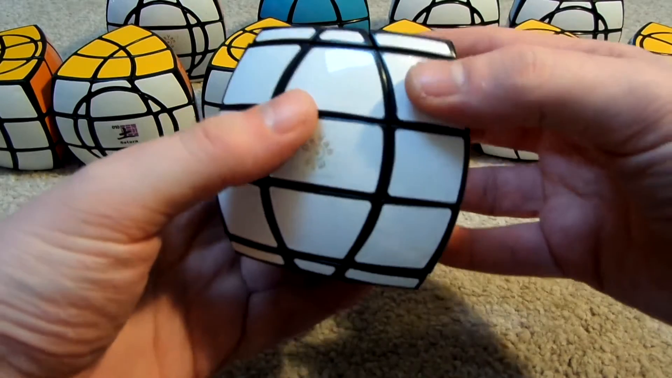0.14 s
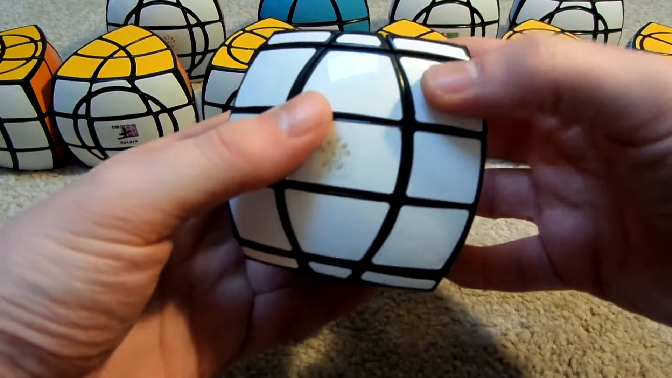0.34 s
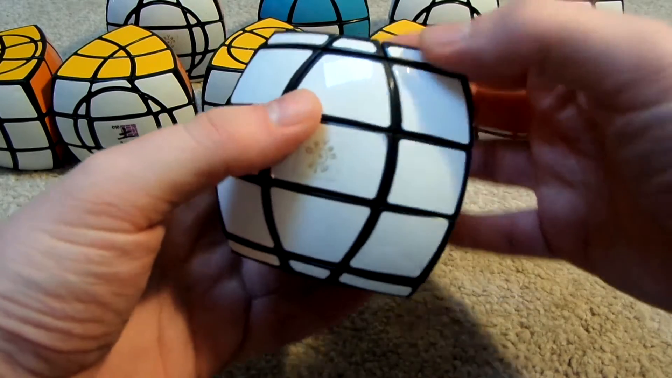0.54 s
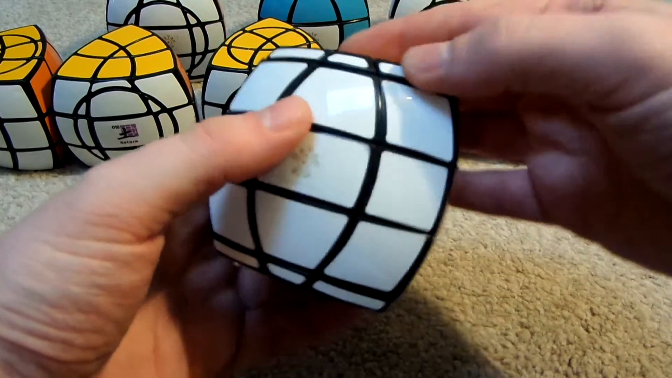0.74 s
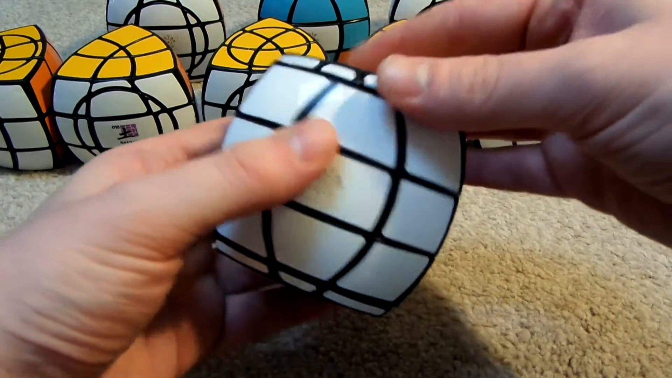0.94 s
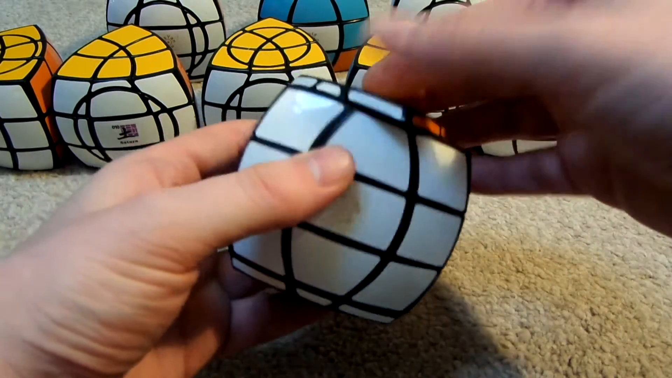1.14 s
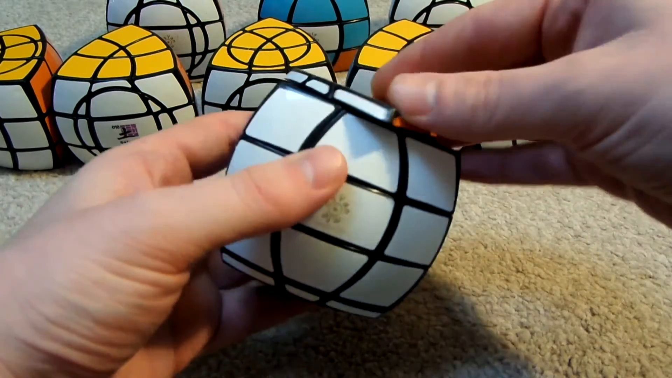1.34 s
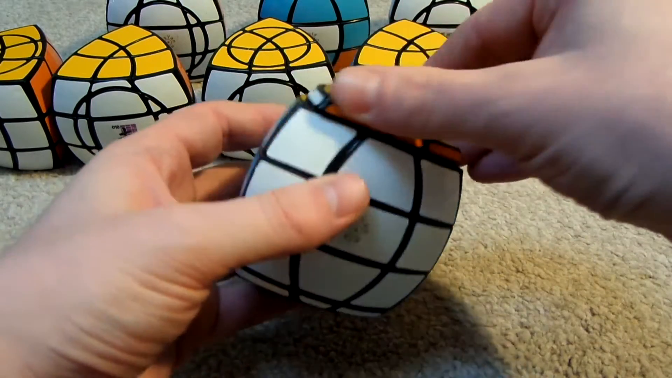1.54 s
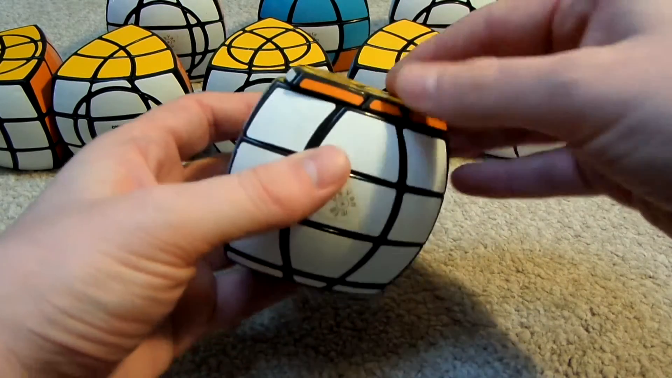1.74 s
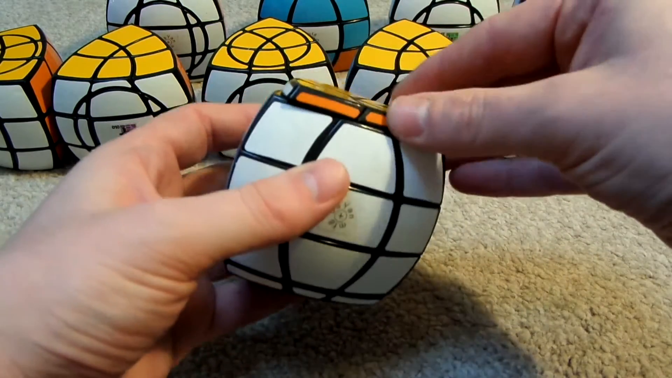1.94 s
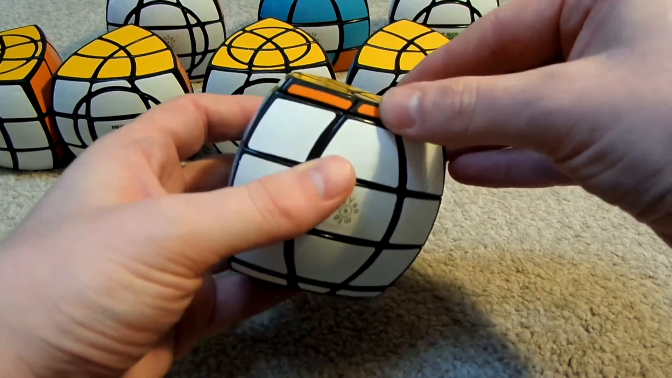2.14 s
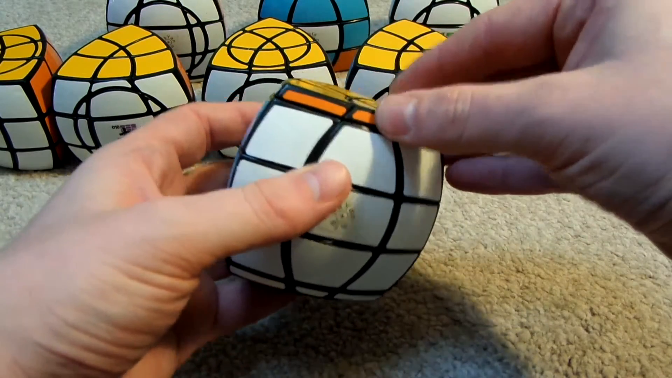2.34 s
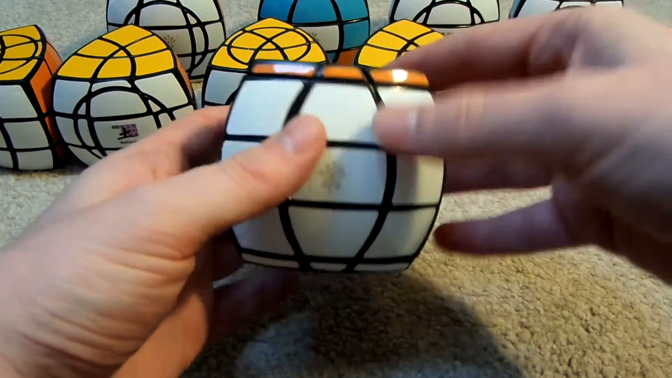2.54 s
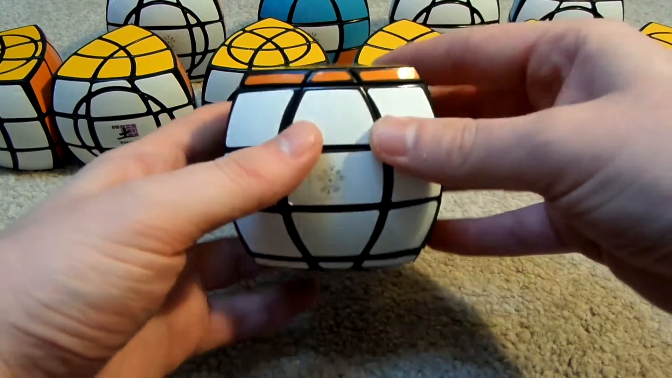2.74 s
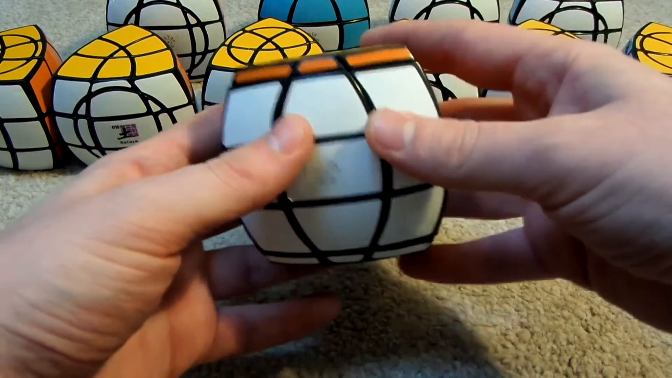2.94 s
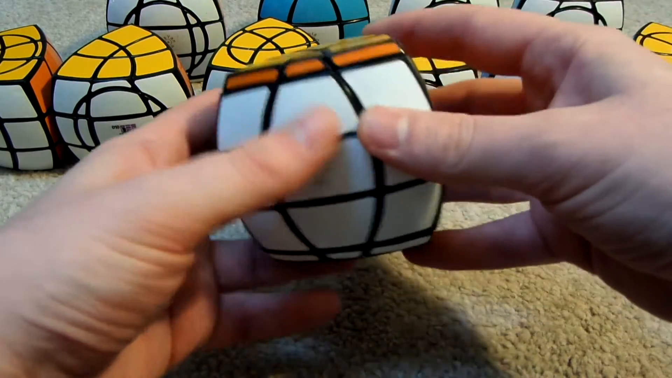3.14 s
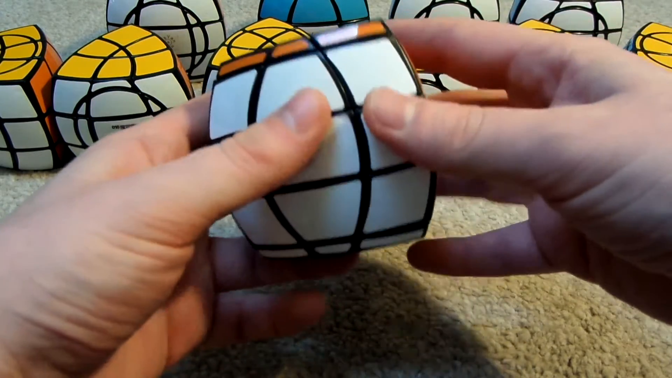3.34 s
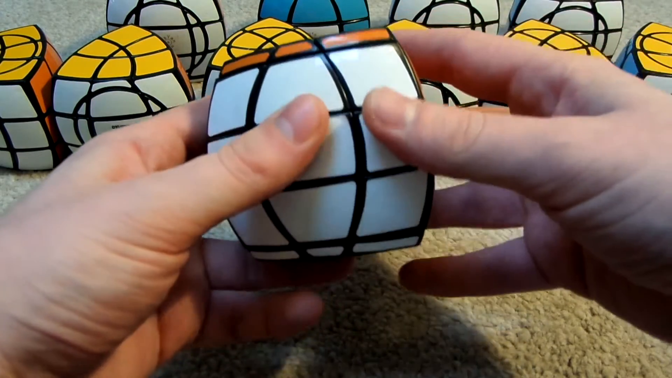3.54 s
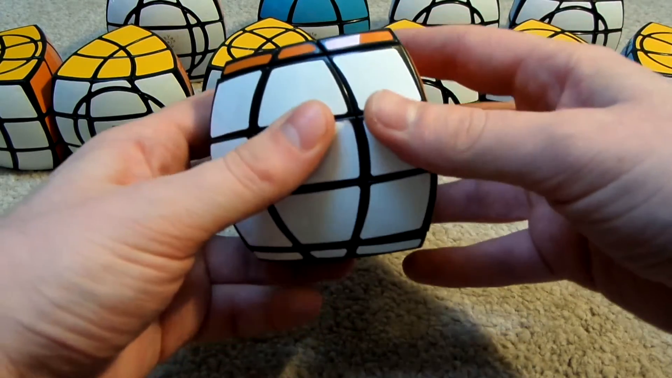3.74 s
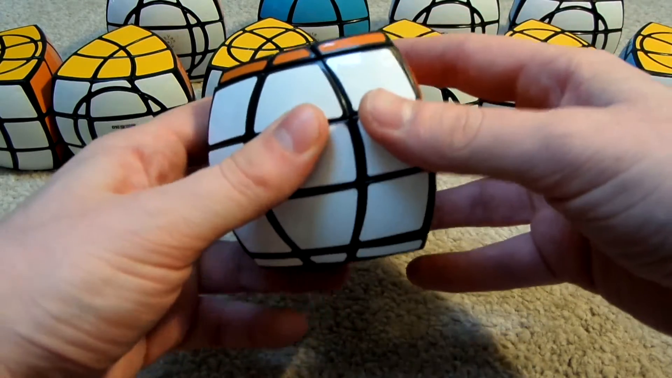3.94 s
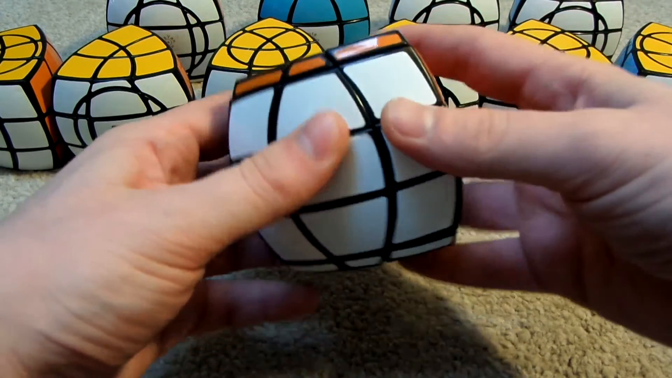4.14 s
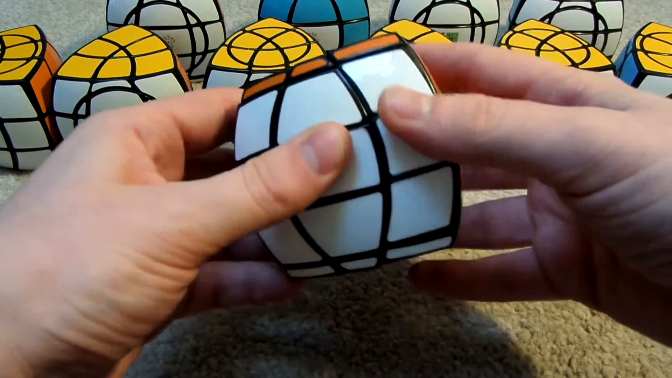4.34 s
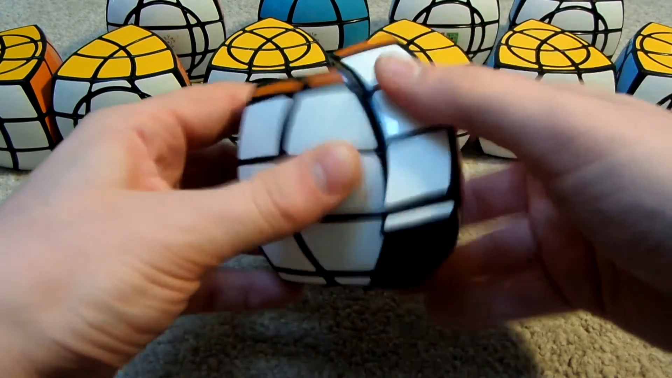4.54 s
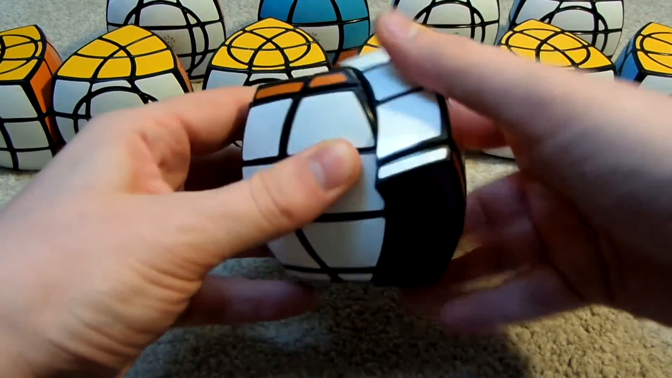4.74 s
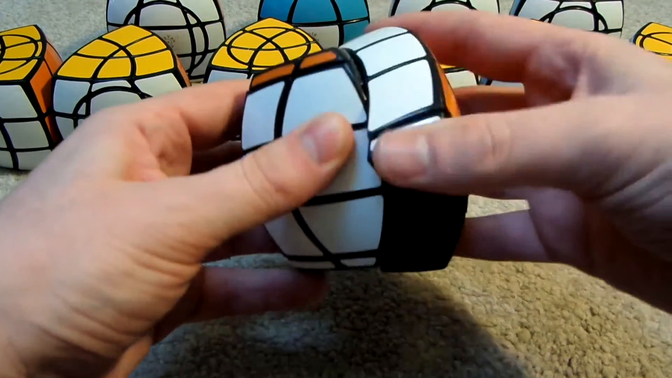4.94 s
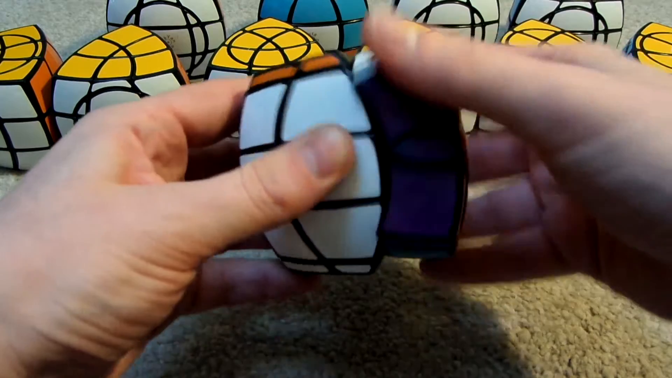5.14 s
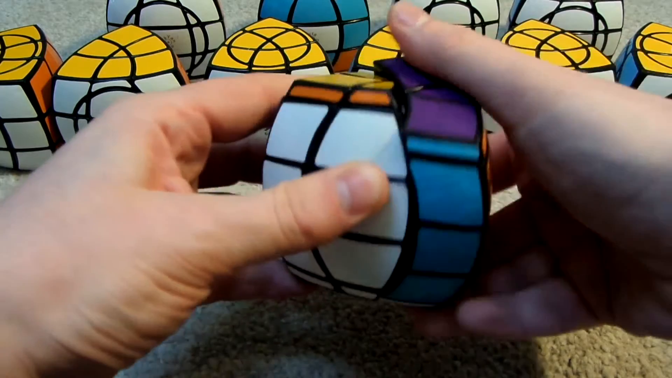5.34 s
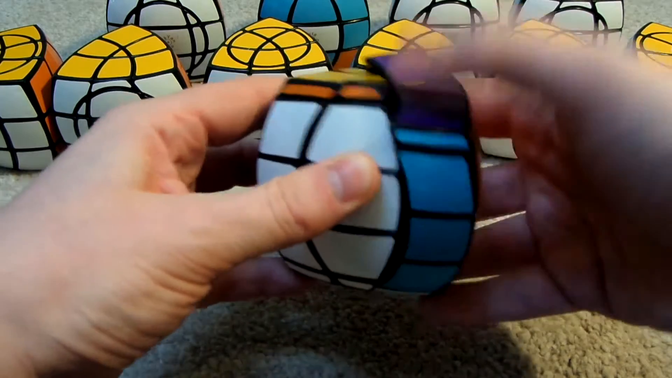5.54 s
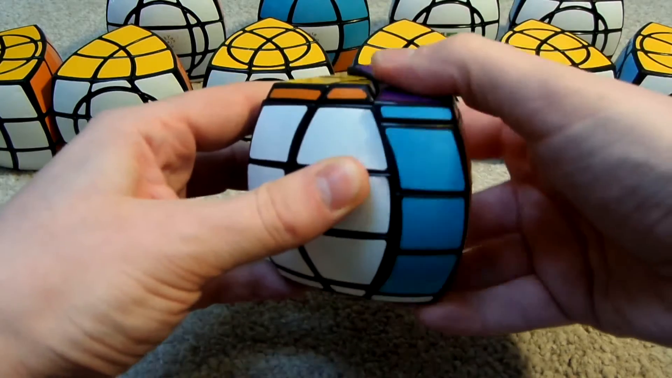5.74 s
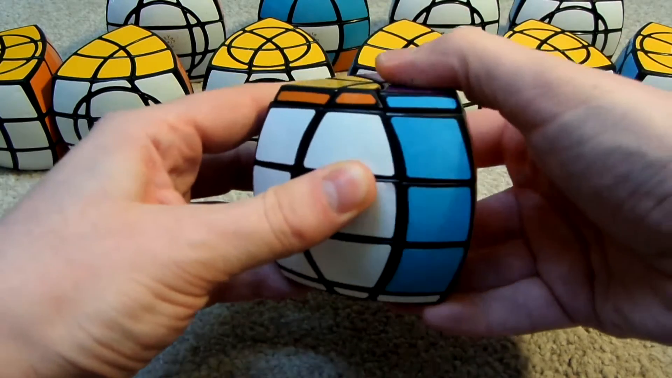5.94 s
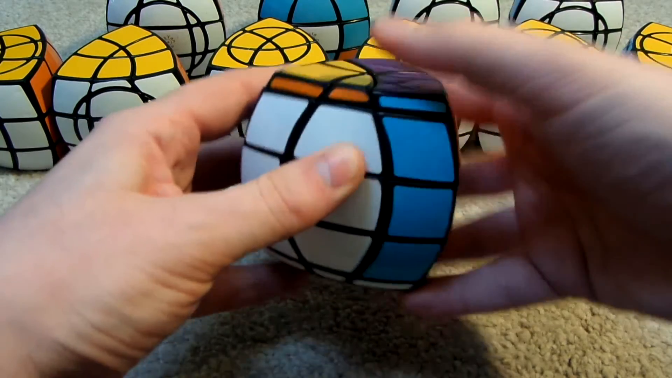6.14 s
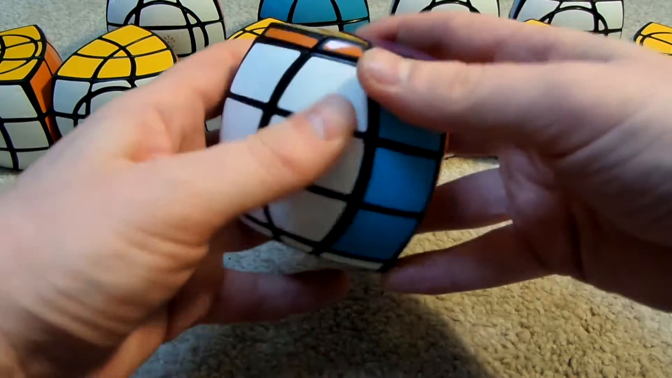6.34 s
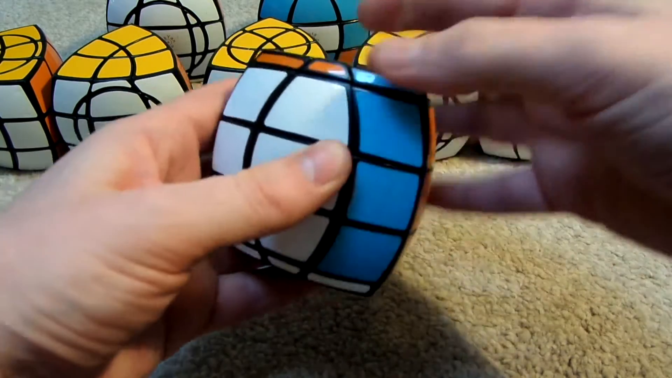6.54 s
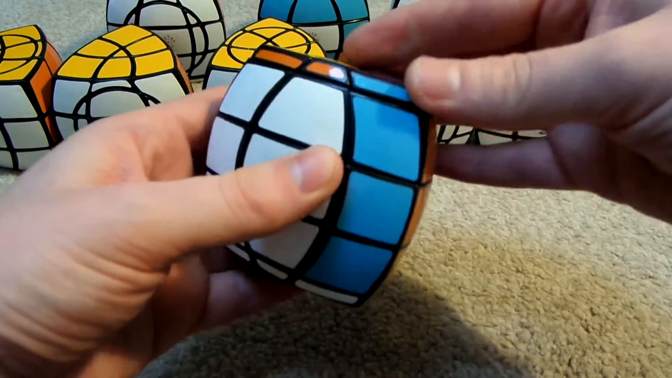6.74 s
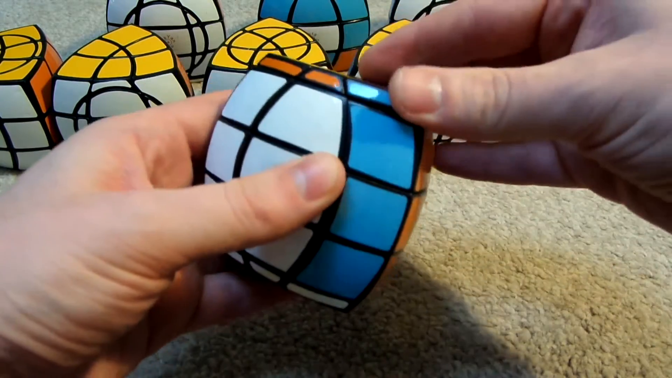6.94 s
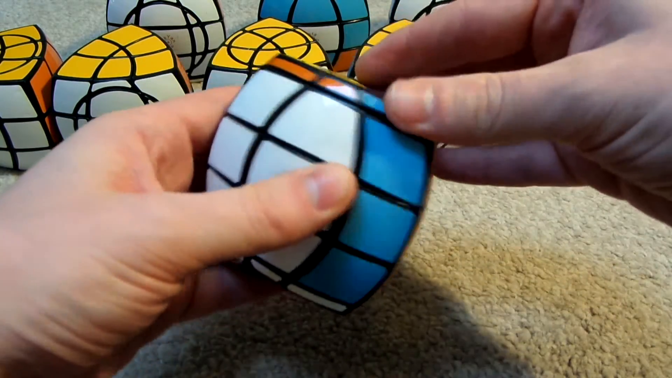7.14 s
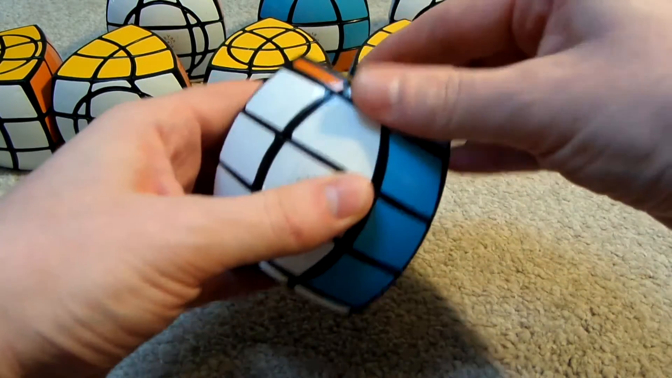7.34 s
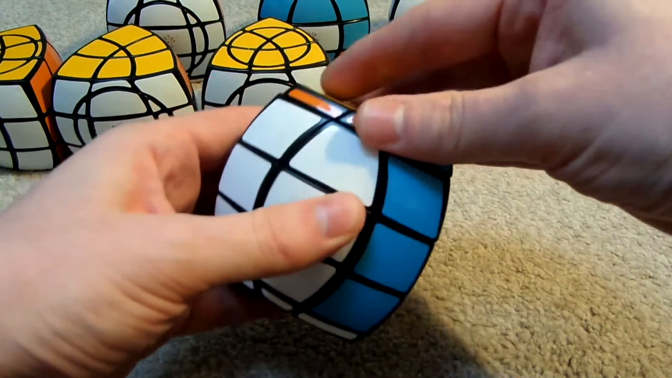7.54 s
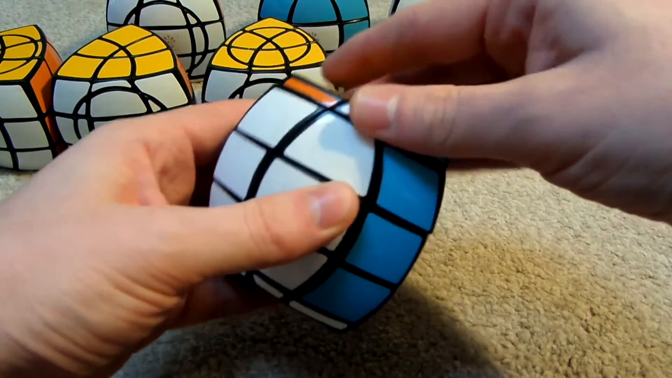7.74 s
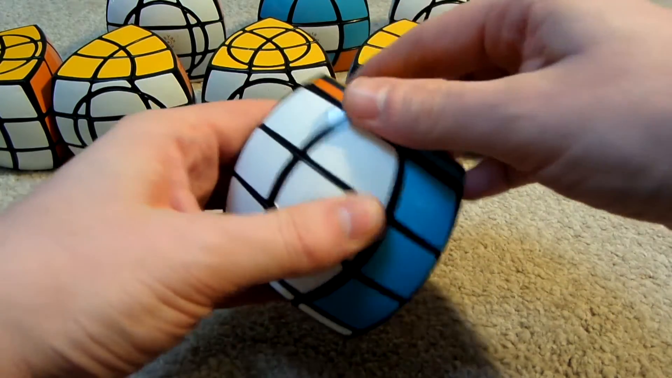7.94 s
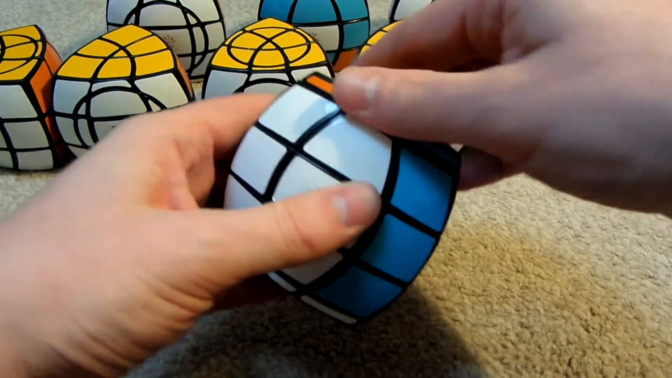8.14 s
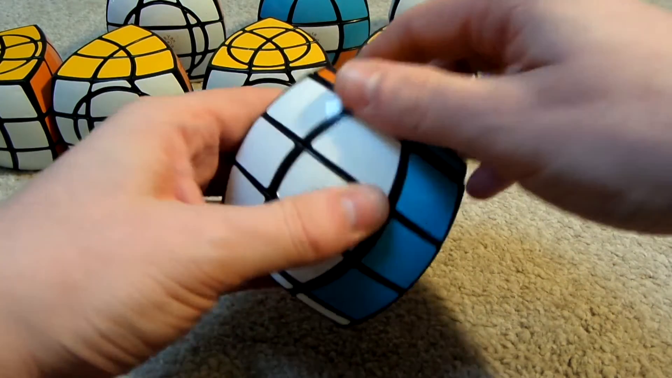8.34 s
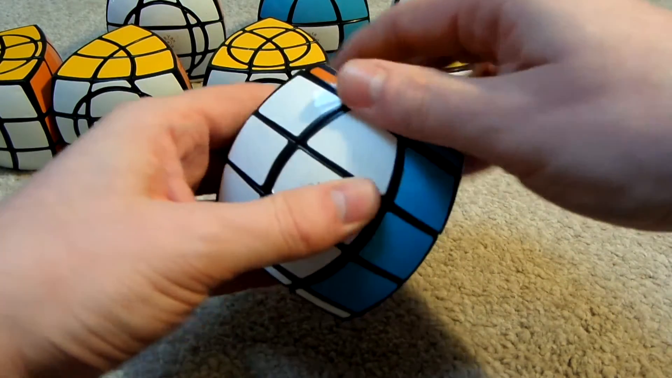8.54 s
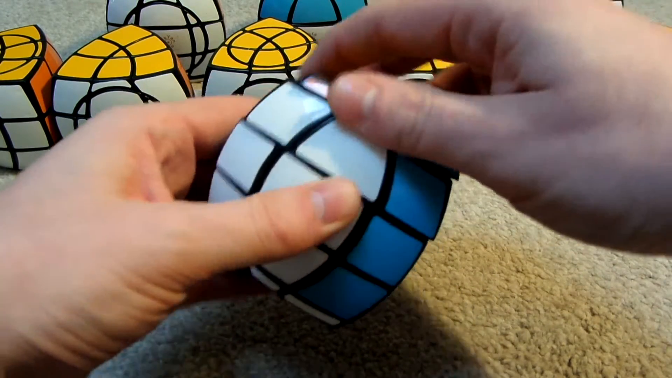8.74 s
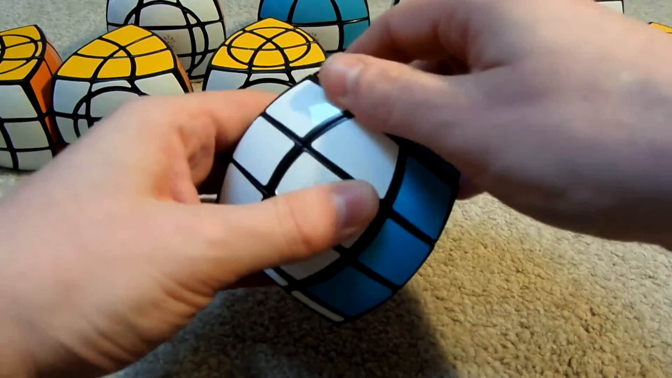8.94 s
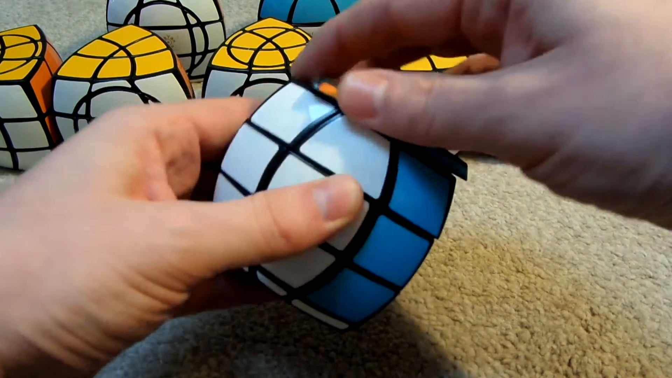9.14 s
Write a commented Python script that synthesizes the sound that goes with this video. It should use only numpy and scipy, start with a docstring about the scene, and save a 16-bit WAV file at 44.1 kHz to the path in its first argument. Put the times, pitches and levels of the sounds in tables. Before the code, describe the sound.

A hollow plastic twisty puzzle is turned by hand, close to the microphone in a small carpeted room. Its pieces catch with irregular clicks and its layers scrape briefly. The clicks thin out, then crowd into a louder run of clacks and grinding, with one small spring ping inside. After a short lull, the turning continues to a last sharp crack. A soft hiss and rumble lie underneath.

```python
"""A hollow plastic twisty puzzle is turned by hand, close by, in a small carpeted room.
Over a soft steady hiss and rumble, its pieces click as they catch and let go, and its layers grind by
stick-slip friction; both ring the shell, and the room answers briefly. After 1.7 s the clicks thin out.
They crowd together again from 4.4 s, and at 4.77 s one spring inside is struck and pings.
The turning eases around 6.5 s, then runs on to a last sharp crack near 9.2 s."""
import sys
import numpy as np
from scipy import signal
from scipy.fft import rfft, irfft, next_fast_len
from scipy.io import wavfile

SR = 44100
rng = np.random.default_rng(int(sys.argv[2]) if len(sys.argv) > 2 else 0)


def transcribe(u):
    """Save the signal u as a 16-bit wav file named by the first command-line argument.

    u: samples, shape (n,) or (channels, n), limited to [-1, 1]; the rate is SR.
    q: integer samples, one column per channel.
    """
    v = np.clip(np.atleast_2d(u).T, -1, 1)
    q = np.round(v * 32767).astype(np.int16)
    wavfile.write(sys.argv[1], SR, q)


N = 404838

# Spectrum of the background noise: (frequency [Hz], relative spectral density [dB])
AIR_SPECTRUM = [(15, -42), (28, -26), (50, -8), (62, -4), (164, -5), (195, -6.5), (259, -6), (407, -10.5),
                (572, -9), (679, -13.5), (1100, -16), (1880, -18.5), (2570, -19.5), (4290, -23),
                (10000, -25), (15800, -24.5)]
# Reverberation time of the room: (frequency [Hz], t60 [s])
ROOM_DECAY = [(300, 0.27), (800, 0.25), (2000, 0.25), (5500, 0.23), (14600, 0.21)]
# Modes of the spring, the top two a beating pair: (frequency [Hz], relative level [dB], t60 [s])
SPRING_MODES = [(2760, 9, .07), (2640, 0, .16), (4172, -12, .3), (6754, -11, .3), (9160, -14, .75),
                (9164, -19, .75)]
# Modes of the plastic shell: (frequency [Hz], bandwidth [Hz], gain [dB])
SHELL_MODES = [(127, 114, -11), (197, 25, -1), (309, 94, -1), (625, 264, 1), (1087, 260, 1), (1538, 236, 2),
               (2010, 340, 0), (2680, 625, -2.5), (3570, 970, -5), (4324, 520, -2), (4840, 1380, -6),
               (6950, 1720, -4.5), (8420, 1410, -2), (10040, 2470, -3), (11510, 1770, -1.5),
               (14140, 2650, -3.5)]
# Layers sliding: (start [s], end [s], gain at start [dB], gain at end [dB], extra sharp-band gain [dB])
LAYER_SLIDES = [(.065, 0.153, -56, -51, -5), (0.955, 1.03, -50, -50, 0), (1.029, 1.175, -41.5, -43, 2),
                (1.412, 1.557, -56, -36.5, 6.5), (1.56, 1.662, -47, -48, 10), (2.088, 2.185, -56, -65, 7),
                (4.445, 4.455, -37, -34, 3), (4.554, 4.578, -21.5, -32.5, 3.5), (4.638, 4.659, -20, -27, 2),
                (4.659, 4.695, -38.5, -26.5, 5.5), (4.686, 4.702, -23.5, -43, -3),
                (4.757, 4.778, -35, -24, 3.5), (4.83, 4.878, -52, -53, -3),
                (5.119, 5.177, -27.5, -32.5, -2.5), (5.215, 5.266, -24.5, -26.5, 0.5),
                (5.267, 5.407, -31, -28.5, 0), (5.388, 5.418, -22, -35, -3), (5.413, 5.443, -26, -55, 3),
                (5.523, 5.578, -55, -46, -18), (5.745, 5.768, -41, -42, 5), (5.817, 5.831, -31, -36, 0),
                (5.871, 5.893, -41, -35.5, 4), (6.88, 7.027, -57, -56, 0), (7.262, 7.312, -61, -46, 5),
                (7.441, 7.575, -51, -57, 0), (7.646, 7.684, -42, -40, 0), (7.86, 7.923, -52, -63, 3),
                (7.952, 7.969, -30.5, -37.5, -1.5), (8.206, 8.267, -49, -58, -7),
                (8.36, 8.455, -51.5, -45, -11), (8.593, 8.681, -57, -45, -1), (8.738, 8.75, -20.5, -42, -4),
                (8.855, 8.896, -55, -28.5, 1), (8.89, 8.953, -36, -44.5, -6),
                (9.058, 9.152, -54, -42.5, -8), (9.15, 9.185, -42, -38, 3)]
# Pieces catching: (time [s], middle-band peak [dB], sharp crack against that peak [dB], piece pitch [Hz])
PIECE_CATCHES = [(0.0481, -36, -8, 970), (.0775, -27, -7, 3140), (.117, -49, 0, 1530),
                 (0.1454, -38, -2, 2900), (0.1575, -35, 7, 3520), (0.2861, -42, -19, 1190),
                 (.3017, -45, -16, 1150), (.3993, -38.5, -1, 5500), (.4127, -50, -3, 1130),
                 (.6132, -37.5, -7, 1110), (0.6455, -28, -7, 3730), (.8043, -33, -14, 1600),
                 (0.8995, -15, 6, 2850), (0.9052, -20.5, -1, 4340), (1.0354, -40, -12, 1730),
                 (1.093, -32.5, 10.5, 6190), (1.1083, -30, -11, 1140), (1.209, -43, -6, 990),
                 (1.3094, -41.5, 7, 1010), (1.4004, -35.5, -10, 980), (1.421, -33, 1, 1020),
                 (1.464, -34, -2, 6230), (1.491, -31.5, -1, 6130), (1.5075, -29, 8, 1580),
                 (1.5509, -15, -5, 5170), (1.61, -27.5, -8, 1690), (1.6311, -25, 6.5, 5500),
                 (2.094, -41, -6, 2700), (2.1376, -40, -2, 1870), (2.2372, -32.5, -1, 2150),
                 (2.7879, -48.5, 3, 2790), (2.879, -34.5, -5, 6450), (2.8903, -33, 6.5, 3430),
                 (3.2736, -48, -8, 1880), (3.409, -51, -8, 2830), (3.5273, -41, -7, 1680),
                 (3.5891, -28, 1, 2060), (3.5931, -33, 0.5, 2040), (3.6757, -38, -4, 5800),
                 (3.8836, -22, 10.5, 5000), (3.888, -31, 10, 1120), (3.9346, -30, 7, 2650),
                 (4.1291, -28.5, 6, 1900), (4.2953, -47, -8, 1380), (4.4436, -44, -3, 3020),
                 (4.4513, -28, -1, 3610), (4.456, -32, 9, 5020), (4.549, -23, 5, 2730),
                 (4.5628, -14.5, 1.5, 2800), (4.5718, -18, -2, 5000), (4.639, -37, -4, 4080),
                 (4.686, -21, -9, 2870), (4.7695, -12, -2, 2620), (4.856, -42, -6, 1980),
                 (4.8778, -30.5, 3, 1930), (4.8826, -38, -5, 1240), (5, -41, -3, 1610),
                 (5.046, -45, -15, 1540), (5.1,  -30.5, 5, 1560), (5.1215, -28, 11, 5000),
                 (5.1282, -27, 6, 6550), (5.141, -20, -2, 1930), (5.16, -25, -11, 1560),
                 (5.1718, -22.5, -19, 1910), (5.215, -26, -6, 3070), (5.2255, -21.5, -1, 600),
                 (5.2358, -25, -8, 6400), (5.257, -19.5, -3, 2200), (5.2676, -32, -9, 2570),
                 (5.3141, -10, -10, 3160), (5.367, -32, 2, 2130), (5.386, -22, -6, 1600),
                 (5.4012, -15.5, -6, 1440), (5.4153, -23, -6, 6360), (5.535, -45, -5, 1900),
                 (5.55, -30, -16, 2100), (5.6212, -33, -22, 1990), (5.6696, -42, 3, 1550),
                 (5.6746, -36, 1, 2240), (5.7264, -38, -9, 2580), (5.7493, -28, 3, 6340),
                 (5.812, -28.5, 6.5, 1540), (5.87, -26, 5, 6500), (5.8747, -28, 13.5, 1580),
                 (5.9016, -33.5, -3, 3300), (6.156, -34.5, -7, 2580), (6.1962, -42, -10, 2170),
                 (6.204, -41, -5, 2020), (6.2271, -43, 2, 1890), (6.4647, -49.5, 6, 1270),
                 (6.5333, -49, -2, 1660), (6.5526, -47, -8, 1600), (6.592, -47, 3, 1570),
                 (6.8266, -47, -15, 1940), (6.882, -48, -6, 1980), (6.889, -38, -13, 1500),
                 (6.9046, -22, 0, 4370), (6.9085, -32.5, 10, 1970), (6.95, -27.5, 5, 2020),
                 (6.9802, -29, 4, 3680), (7.255, -30, -4, 5530), (7.2678, -30, -5, 1550),
                 (7.277, -33, 5.5, 4240), (7.3054, -39, -6, 5860), (7.3151, -34.5, -10, 630),
                 (7.4456, -48, -14, 1550), (7.462, -45, -8, 1000), (7.4768, -37, -10, 2320),
                 (7.5202, -44, -6, 1960), (7.556, -36.5, 8, 5800), (7.598, -32, -12, 1930),
                 (7.61, -32, 4, 5790), (7.6133, -35, -6, 1900), (7.651, -39, 2, 6460),
                 (7.6589, -27.5, 8, 1920), (7.719, -30, -1, 1980), (7.7254, -29.5, -2, 5370),
                 (7.831, -30, -4, 1600), (7.8348, -27, 0, 5260), (7.851, -43, -2, 2100),
                 (7.8662, -39, -4, 633), (7.9002, -43.5, -6, 530), (7.9325, -39, -4, 1950),
                 (7.949, -41, 3, 5710), (7.9632, -33, -6, 1700), (8.0792, -22.5, -7, 5800),
                 (8.223, -41, -6, 2290), (8.234, -39, -6, 1960), (8.2415, -32.5, -5, 4570),
                 (8.262, -35.5, -6, 750), (8.317, -45.5, -10, 1500), (8.378, -34.5, -20, 2080),
                 (8.447, -39.5, -2, 1050), (8.4836, -27.5, 1, 1490), (8.584, -33.5, -3, 2300),
                 (8.599, -37, -12, 2610), (8.6088, -37, -16, 4620), (8.6287, -36, -14, 610),
                 (8.6366, -40, -16, 1580), (8.6522, -37.5, -10, 2030), (8.7044, -30.5, -1, 2010),
                 (8.71, -31.5, -16, 1670), (8.733, -26, 0, 1600), (8.738, -36, 0, 2780),
                 (8.7392, -10, 4, 6600), (8.8285, -41, -10, 2740), (8.8829, -25.5, 10.5, 5180),
                 (8.892, -25, -5, 2030), (8.9296, -26, -13, 3040), (8.997, -28, -18, 2190),
                 (9.0765, -47, -7, 1470), (9.0908, -38, -18, 665), (9.0974, -42, -6, 1180),
                 (9.1132, -32.5, -4, 1570), (9.1609, -11.5, 9, 7100), (9.1625, -24, 15, 6800),
                 (9.1697, -32, 16, 4960)]

USUAL_DB, USUAL_HZ = -33, 2000  # the typical catch, to which knock, ring and chatter are referred


def amp(db):
    """Amplitude ratio of a level in decibels."""
    return 10 ** (np.asarray(db) / 20)


def unit(x):
    """Normalisation to an rms of 1."""
    return x / np.sqrt(np.mean(x ** 2) + 1e-20)


def along(points, hz):
    """Interpolation of (frequency, value) points on a logarithmic frequency axis."""
    freqs, values = np.transpose(points)
    return np.interp(np.log(hz + 1), np.log(freqs + 1), values)


def filtered(x, response):
    """Linear filtering: the spectrum of x times a complex frequency response."""
    n = x.shape[-1]
    padded = next_fast_len(n + 4096)
    return irfft(rfft(x, padded) * response(np.fft.rfftfreq(padded, 1 / SR)), padded)[..., :n]


def bands(x, low_hz=2000, high_hz=7000):
    """Complementary filters split x into hollow (low), middle and sharp (high) bands."""
    low = lambda hz: 1 / (1 + (hz / low_hz) ** 4)
    high = lambda hz: 1 - 1 / (1 + (hz / high_hz) ** 6)
    return filtered(x, low), filtered(x, lambda hz: 1 - low(hz) - high(hz)), filtered(x, high)


def place(rows, starts_s):
    """Superposition of the rows, each delayed to its start."""
    index = np.round(starts_s * SR).astype(int)[:, None] + np.arange(rows.shape[1])
    return np.bincount(index.ravel(), rows.ravel(), N + rows.shape[1])[:N]


def air(noise_db=-53.5, whine_db=-80, whine_hz=14906):
    """Stationary noise: the room's rumble and hiss, with one thin pure tone; levels are rms."""
    noise = unit(filtered(rng.standard_normal(N), lambda hz: amp(along(AIR_SPECTRUM, hz))))
    whine = np.sqrt(2) * np.sin(2 * np.pi * whine_hz * np.arange(N) / SR)
    return amp(noise_db) * noise + amp(whine_db) * whine


def room(x, gap_s=0.004, stretch=6000):
    """Diffuse reverberation: convolution with a noise tail, each band decaying at its own rate."""
    out = np.zeros(N + SR)
    for start in range(0, N, stretch):  # the moving hands give every stretch a new tail
        hz, t, spectra = signal.stft(rng.standard_normal(SR // 3), SR, nperseg=128)
        decay = amp(-60 * t / along(ROOM_DECAY, hz)[:, None])
        tail = signal.istft(spectra * decay, SR, nperseg=128)[1]
        wet = signal.fftconvolve(x[start:start + stretch], tail / np.linalg.norm(tail))
        out[start + int(gap_s * SR):][:len(wet)] += wet
    return out[:N]


def spring(struck_s=4.77, level_db=-36):
    """Free vibration of lightly damped modes: steel rings far longer than the plastic around it."""
    t = np.clip(np.arange(N) / SR - struck_s, 0, None)
    return sum(amp(level_db + db - 60 * t / t60) * np.sin(2 * np.pi * hz * t)
               for hz, db, t60 in SPRING_MODES)


def resonance(hz, centre, width):
    """Response of a damped oscillator, equal to 1 at its centre frequency."""
    return 1j * hz * width / (centre ** 2 - hz ** 2 + 1j * hz * width)


def shell(hz, extra_db=0):
    """Modal sum of the shell, alternating in sign; each row of extra gains gives one response."""
    centre, width, db = np.transpose(SHELL_MODES)[..., None]
    signs = (-1) ** np.arange(len(SHELL_MODES))[:, None]
    return amp(db[:, 0] + extra_db) @ (signs * resonance(hz, centre, width))


def friction(grains_per_s=1100, spread_db=3, grain_t60=0.0037):
    """Stick-slip friction: uneven grains on a smooth rub excite the shell; three bands at rms 1."""
    slips = rng.random(N) < grains_per_s / SR
    sizes = amp(spread_db * rng.standard_normal(N))
    puff = amp(-60 * np.arange(200) / SR / grain_t60)
    grit = unit(signal.fftconvolve(slips * sizes, puff)[:N] * rng.standard_normal(N))
    rub = filtered(grit + rng.standard_normal(N), shell)
    return [unit(band) for band in bands(rub)]


def slides(hollow, middle, sharp, edge_s=0.0038):
    """Sliding friction sounds while a layer moves, its level changing linearly in decibels."""
    t, out = np.arange(N) / SR, np.zeros(N)
    for start, end, first_db, last_db, sharp_db in LAYER_SLIDES:
        span = slice(int((start - edge_s) * SR), int((end + edge_s) * SR))
        gate = np.clip(np.minimum(t[span] - start, end - t[span]) / (2 * edge_s) + 0.5, 0, 1)
        gain = amp(np.interp(t[span], (start, end), (first_db, last_db)))
        mix = amp(-13) * hollow[span] + amp(-9.5) * middle[span] + amp(sharp_db - 8) * sharp[span]
        out[span] += gate * gain * mix
    return out


def chatter(hollow, middle, sharp, t60=0.04):
    """Exponentially decaying friction: the faces rub on briefly after every clear catch."""
    times, peak_db, crack_db, _ = np.transpose(PIECE_CATCHES)
    level_db = -47.5 + 0.5537 * (peak_db - USUAL_DB)
    t = np.arange(SR // 10) / SR
    envelope = lambda db: place(amp(db[:, None] - 60 * t / t60), times)
    return envelope(level_db) * (amp(-3.5) * hollow + middle) + envelope(level_db + crack_db - 2.5) * sharp


def loose_ticks(per_s=3):
    """A random point process: loose pieces tick faintly in the hands; columns as in PIECE_CATCHES."""
    count = int(per_s * N / SR)
    level, crack, pitch = rng.standard_normal((count, 3)).T
    times = rng.random(count) * N / SR
    return np.transpose([times, -52 + 2.5 * level, -8 + 4 * crack, 1800 * 2 ** (0.12 * pitch)])


def knock_db(peak_db, piece_hz, large_hz=1700):
    """Scaling law of the hollow knock against the peak: less for hard blows and small pieces."""
    db = -5.5 - 0.1016 * (peak_db - USUAL_DB) - 1.5 * np.log2(piece_hz / USUAL_HZ)
    return db + 5.5 * np.clip(np.log2(large_hz / piece_hz), 0, 1)  # large pieces are hollower still


def contact(noise, lead_s, scuff_db=-17, rise_s=0.00064, fall_s=0.01):
    """Impact excitation: a faint scuff, then a broadband burst of a few milliseconds; one per row."""
    t = np.arange(noise.shape[1]) / SR
    since_hit = np.clip(t - lead_s, 0, None)
    scuff = amp(scuff_db) * np.minimum(t / lead_s, 1)
    attack = 1 - np.exp(-(since_hit / rise_s) ** 2)
    envelope = (attack + scuff) * amp(-60 * since_hit / fall_s)
    spectrum = rfft(noise * envelope)
    whitened = irfft(spectrum / np.abs(spectrum))  # an even, colourless snap before piece and shell ring
    return whitened * envelope ** 0.5


def clicks(lead_s=0.0025, piece_q=4, scatter_db=2.5, length=1024):
    """Impacts ring piece and shell. Returns the direct sound and its average over all directions."""
    times, peak_db, crack_db, piece_hz = np.vstack([PIECE_CATCHES, loose_ticks()]).T
    noise, scatter = np.hsplit(rng.standard_normal((len(times), length + len(SHELL_MODES))), [length])
    pitch = piece_hz[:, None]
    ring = amp(6 - 0.27 * (peak_db[:, None] - USUAL_DB))  # a softly struck piece rings more clearly
    piece = lambda hz: 1 + ring * resonance(hz, pitch, pitch / piece_q)
    rung = filtered(contact(noise, lead_s), lambda hz: piece(hz) * shell(hz, scatter_db * scatter))
    impulses = np.tile(signal.unit_impulse(length, 100), (len(times), 1))
    even = filtered(impulses, lambda hz: piece(hz) ** 0.5 * shell(hz))  # the colour the walls receive
    band_db = (peak_db + knock_db(peak_db, piece_hz), peak_db, peak_db + crack_db)
    direct, around = np.zeros(N), np.zeros(N)
    for band, even_band, db in zip(bands(rung), bands(even), band_db):
        band = band / np.abs(band).max(1, keepdims=True)
        even_band = even_band / even_band.std(1, keepdims=True) * band.std(1).mean()
        gain = amp(db)[:, None]
        direct += place(gain * band, np.abs(times - lead_s))
        around += place(gain * even_band, times)
    return direct, around


def scene():
    """Superposition of background, reverberation and the puzzle's direct sound, in one channel."""
    snap, around = clicks()
    rub_bands = friction()
    rub = slides(*rub_bands) + chatter(*rub_bands)
    reverberation = room(amp(-12) * around + amp(-8) * rub)
    return (air() + reverberation + spring() + rub + snap)[None]


def record(dry, shelf_hz=15850, shelf_db=-30, limit_hz=16855):
    """Band limiting: the treble drops by a steep step, then ends altogether."""
    step = lambda hz: np.clip((hz - shelf_hz) / 250 + 0.5, 0, 1)
    edge = lambda hz: np.clip((limit_hz - hz) / 100, 0, 1)
    return filtered(dry, lambda hz: amp(shelf_db * step(hz)) * edge(hz))


dry = scene()
out = record(dry)
transcribe(out)
```